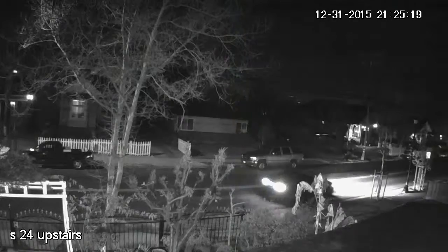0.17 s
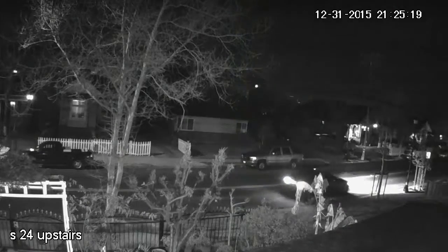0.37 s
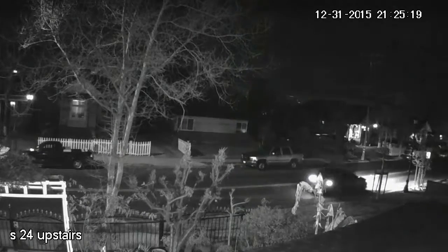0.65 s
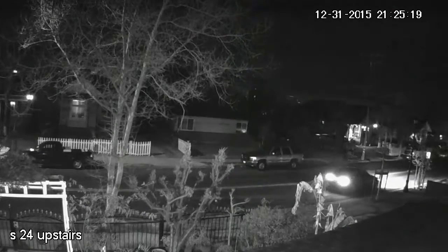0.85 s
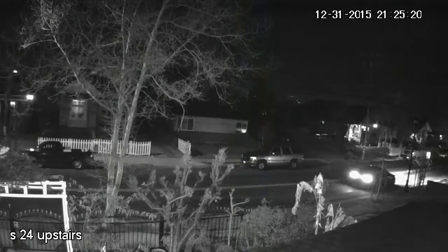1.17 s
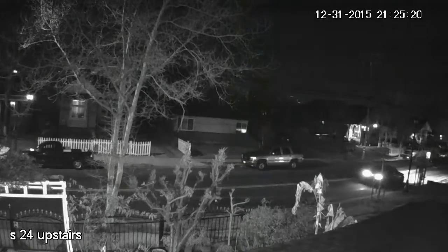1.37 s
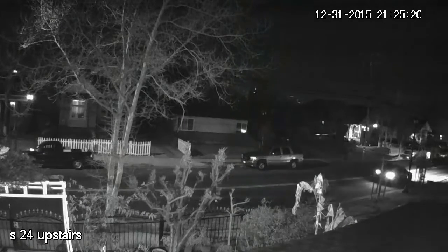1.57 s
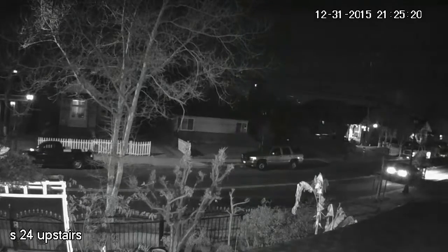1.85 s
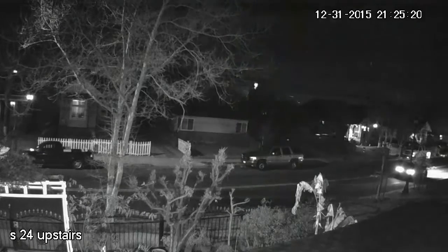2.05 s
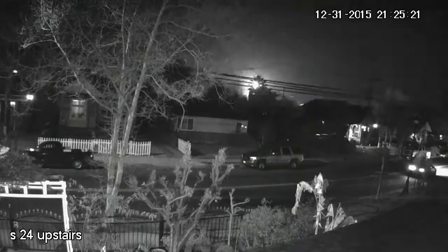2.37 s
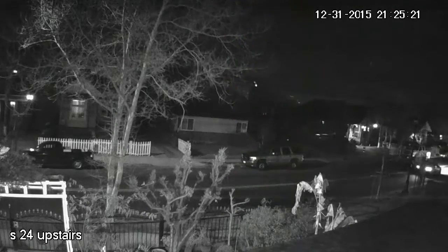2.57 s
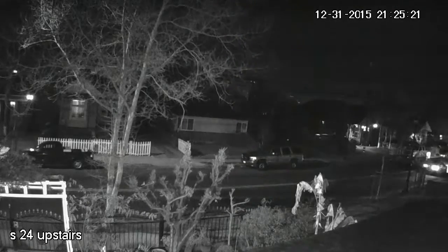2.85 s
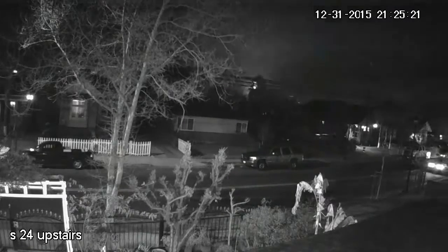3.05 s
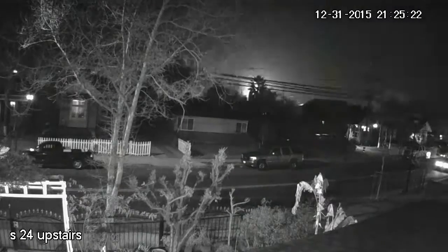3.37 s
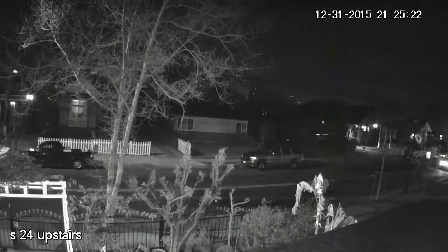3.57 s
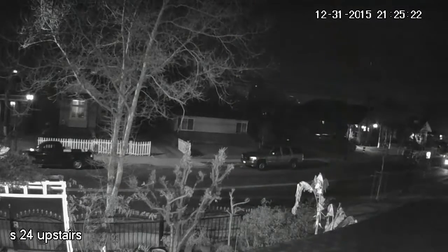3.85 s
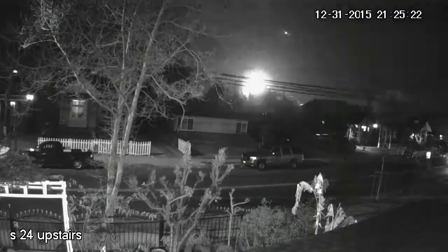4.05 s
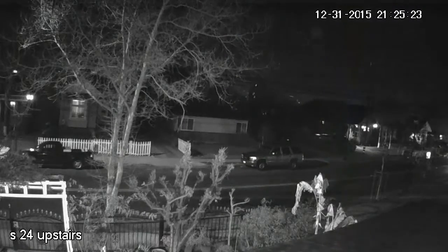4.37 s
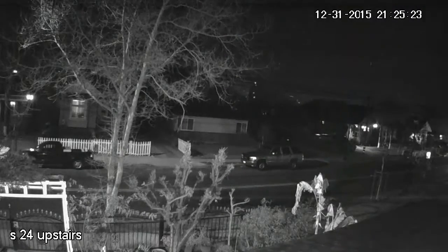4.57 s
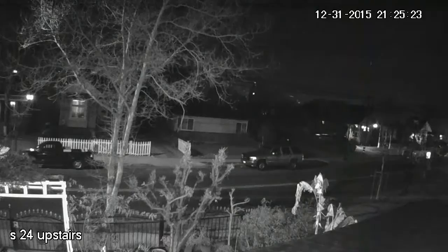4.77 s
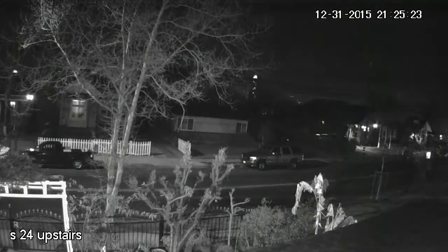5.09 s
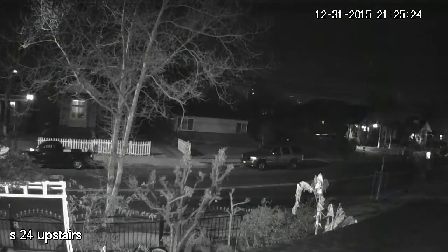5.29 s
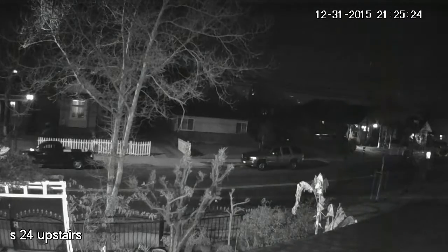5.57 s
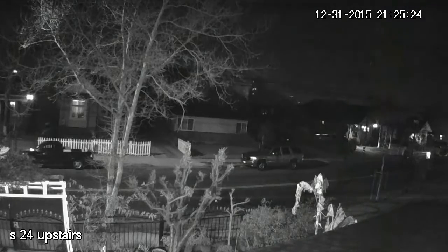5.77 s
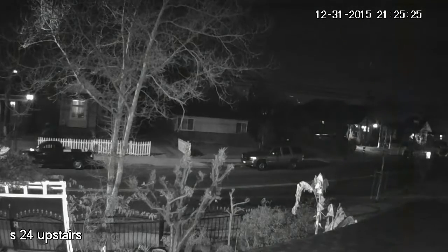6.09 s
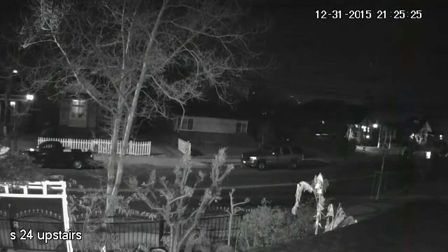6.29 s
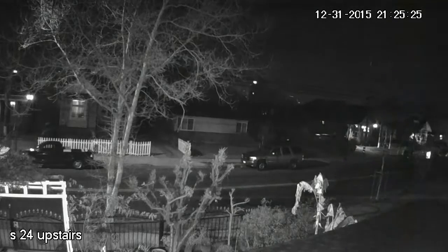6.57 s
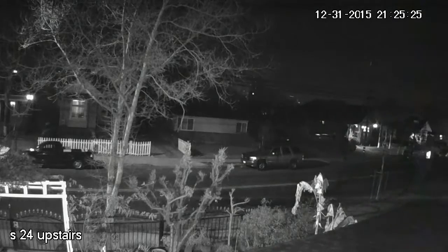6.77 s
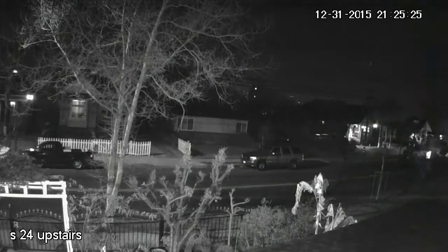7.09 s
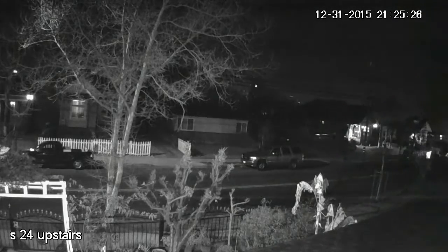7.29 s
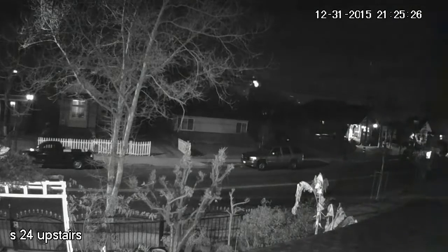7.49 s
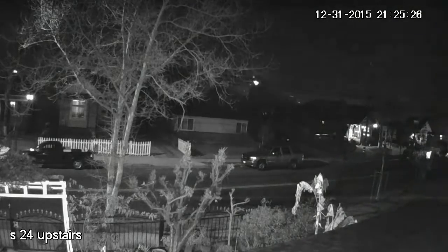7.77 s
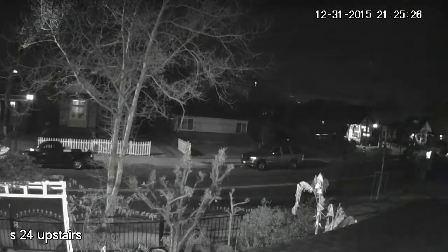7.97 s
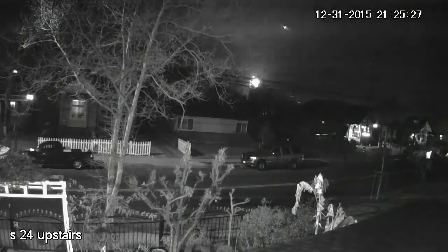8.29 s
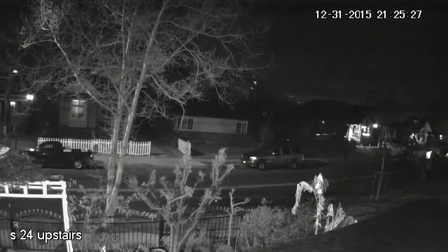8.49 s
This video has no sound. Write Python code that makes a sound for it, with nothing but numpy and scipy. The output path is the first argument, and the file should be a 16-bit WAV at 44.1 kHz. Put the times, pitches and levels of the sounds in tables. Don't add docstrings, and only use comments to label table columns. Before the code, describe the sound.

A muffled barrage of aerial fireworks booms over a residential street, each bang slapping back from houses, while a passing car fades early on.

```python
import sys
import numpy as np
from scipy import signal
from scipy.io import wavfile
from scipy.ndimage import uniform_filter1d

SR = 44100
rng = np.random.default_rng(int(sys.argv[2]) if len(sys.argv) > 2 else 0)


def wrap_up_sound(samples):
    columns = np.atleast_2d(samples).T
    tamed = np.clip(columns, -1, 1)
    steps = np.round(tamed * 32767).astype(np.int16)
    wavfile.write(sys.argv[1], SR, steps)


def nominal_scale(level):
    x = np.asarray(level, float) / 20
    return 10 ** x


N = 381024
CAMERA_RATE = 8000

# delay in seconds, depth of the wall in seconds,
# pitch of its body in Hz, body level in dB, crack level in dB.
WALL_ECHOES = [(0.017, 0.0084, 320, -11.5, -17), (.025, 0.0031, 445, -11, 0), (.035, 0.0084, 400, -4.5, 0),
               (.043, 0.011, 360, -5.5, -13.5), (.071, .006, 260, -5, -9.5), (.099, 0.006, 380, 0, -12),
               (.110, .018, 345, 0.5, -4.5), (.123, 0.0053, 385, -1.5, -13.5),
               (.140, 0.015, 255, -14, -13.5), (.149, 0.009, 290, -6, -12), (.163, 0.017, 236, -5.5, -18),
               (.185, 0.0096, 345, -13.5, -17.5), (.212, 0.013, 270, -13.5, -28),
               (.223, 0.0056, 455, -6, -7.5), (0.238, 0.01, 320, -14, -15), (.265, .018, 290, -14.5, -20),
               (.305, 0.0067, 375, -14, -14), (.371, 0.01, 300, -7.5, -24.5),
               (.389, 0.014, 310, -10, -15.5), (.417, 0.0053, 310, -11.5, -20.5),
               (.45, .012, 390, -16, -20), (.543, 0.015, 330, -17, -20.5)]


def shells(likeness=.6):
    # start in seconds, blast strength in dB, bass in dB, answer of the far walls in dB,
    # ring of the mortar tube in dB.
    firings = [(0.9785, 1, 1, -6, -13), (1.909, 0.5, 1, 1, -12.5), (3.5865, 1, 1.5, 1, -9.5),
               (3.6278, 0.5, -2, 1.5, -8.5), (3.821, 0.5, 2, -4, -7), (4.016, -1.5, 4.5, 0, -8),
               (4.401, -1, 0.5, 4, -12), (4.6639, -0.5, 0.5, 3.5, -9), (4.8644, 1.5, 3, 7, -13),
               (4.9267, -1, -2, -5.5, -8.5), (5.0101, 1.5, -1, -1.5, -8.5), (5.662, -1.5, -3.5, -0.5, 6.5),
               (6.5306, 2, 1.5, -7, -11.5), (6.5943, -1, 2, 1, -10.5), (6.6626, 1, 2, -1, -9),
               (7.3761, 2, 1.5, -1, -13.5), (7.4666, -1, -0.5, -1.5, -9.5), (8.0647, 2, 0.5, 2, -11)]
    lead = .0002
    lumps_db = 3
    bright_db, bright_per_tube_db = 2.49, 0.2825
    tube = signal.iirpeak(311, 1.6, SR)

    out = np.zeros(N)
    frames = 330
    shape = rng.uniform(-1, 1, (len(WALL_ECHOES), 8))
    shared = rng.standard_normal((frames, 129, 2)) @ [1, 1j]
    lumps = uniform_filter1d(shared[:, -1:].real, size=3, axis=0)
    lumps = nominal_scale(lumps_db * np.tanh(lumps / lumps.std()))
    same = np.clip(likeness, 0, 1)
    for start, strength_db, bass_db, far_db, tube_db in firings:
        colour = bright_db + bright_per_tube_db * tube_db, bass_db
        change = rng.standard_normal((len(WALL_ECHOES), 8))
        own = rng.standard_normal((frames, 129, 2)) @ [1, 1j]
        scatter = same * shared + np.sqrt(1 - same ** 2) * own
        answer = roll(lumps * scatter, *colour)
        add(answer, 0, nominal_scale(-11 + bass_db) * burst(97, .035, 1.5))
        add(answer, 0, walls(shape, change, *colour, far_db))
        answer = answer + nominal_scale(tube_db) * signal.lfilter(*tube, answer)
        add(out, start - lead, nominal_scale(strength_db) * blast())
        add(out, start, nominal_scale(strength_db) * answer)
    return out


def blast(swell=.001, ring_hz=208):
    t = np.arange(0, .02, 1 / SR)
    envelope = (t / swell) ** 2 * np.exp(-t / swell)
    return nominal_scale(13.5) * envelope * np.sin(2 * np.pi * ring_hz * t)


def walls(shape, change, bright_db, bass_db, far_db):
    # pitch in Hz, spread of pitch between walls as a share, level in dB.
    ring_parts = [
        (182.5, 0.32, -1.5),
        (355.3, 0.013, -0.5),
        (1486, 0.062, -3),
        (996, 0.14, -4.5),
    ]
    usual_depth, far_delay = 0.0089, .33
    fewest_cycles = 2.8
    out = np.zeros(SR)
    for wall, fixed, moved in zip(WALL_ECHOES, shape, change):
        delay, depth, body_hz, body_db, crack_db = wall
        boom_db = -13.5 + 9 * np.log2(depth / usual_depth) - 17.0 * delay
        levels = boom_db + bass_db, body_db, crack_db + bright_db, crack_db + bright_db
        for k, (hz, spread, db) in enumerate(ring_parts):
            hz = body_hz if k == 1 else hz
            length = max(1.41 * depth, fewest_cycles / hz)
            phase = 3 * fixed[k + 4] + .5 * moved[k + 4]
            ring = burst(hz * (1 + spread * fixed[k]), length, phase)
            db = levels[k] + db + 0.63 * moved[k] + far_db * (delay > far_delay)
            add(out, delay - length / 2, nominal_scale(db) * ring)
    return out


def roll(chance, bright_db, bass_db):
    # pitch in Hz, starting level in dB, time to die away by 60 dB in seconds.
    roll_bands = [(61.3, -28.5, 2), (97, -21, 4.9), (161.3, -23.5, 2.9), (227, -16, 3.9), (334, -17, 2.6),
                  (489, -16, 2.6), (750, -26, 2.5), (953, -22.5, 2.3), (1260, -24, 2.6), (1510, -20, 2.3),
                  (1758, -32.5, 2), (2260, -52, 1.8)]
    boom_top_hz, crack_bottom_hz = 225, 700
    hz = np.fft.rfftfreq(256, 1 / CAMERA_RATE)
    t = np.arange(len(chance)) * 64 / CAMERA_RATE
    db = read(roll_bands, hz) + bright_db * (hz > crack_bottom_hz) + bass_db * (hz < boom_top_hz)
    db = db - 60 * t[:, None] / read(roll_bands, hz, column=2)
    tail = signal.istft((chance * nominal_scale(db - 5)).T, nperseg=256, noverlap=192)[1]
    build_up = 1 - np.exp(-np.arange(len(tail)) / (0.061 * CAMERA_RATE))
    return signal.resample_poly(tail * build_up, SR, CAMERA_RATE)


def burst(hz, length, phase):
    t = np.arange(0, length, 1 / SR)
    return np.sin(np.pi * t / length) ** 2 * np.cos(2 * np.pi * hz * (t - length / 2) + phase)


def car():
    # time in seconds, pitch in Hz, level in dB.
    exhaust = [(0, 85.07, -20.5), (.15, 83.9, -28.5), (.45, 84.24, -23), (.9, 85.3, -24.5),
               (1.15, 86.76, -33), (1.45, 86.44, -24.5), (1.75, 86.35, -35), (2.1, 85, -45),
               (3, 86.9, -37.5), (3.55, 79.3, -45.5)]
    # start in seconds, length in seconds, pitch in Hz, level in dB.
    bump = (.03, .055, 88, -12)
    turns = np.cumsum(curve(exhaust)) / SR
    note = np.sin(2 * np.pi * turns)
    note = note + nominal_scale(-15) * np.sin(np.pi * turns) + nominal_scale(-19.0) * np.sin(6 * np.pi * turns)
    gone = np.clip(exhaust[-1][0] + 0.26 - np.arange(N) / SR, 0, .3) / 0.2
    out = np.sqrt(2) * nominal_scale(curve(exhaust, column=2)) * gone * note
    start, length, hz, db = bump
    add(out, start, nominal_scale(db) * burst(hz, length, 0))
    add(out, start, nominal_scale(db - 7.0) * burst(2.1 * hz, length, 0.82))
    return out


def street():
    # pitch in Hz, level in dB per Hz.
    town_colour = [(12, -28.5), (22, -12), (42, -3.5), (70, -8.5), (150, -15.5), (280, -12.5), (450, -15.5),
                   (750, -23), (980, -19), (1250, -23.5), (1500, -18.5), (1900, -41.5), (2600, -67),
                   (4000, -110)]
    # pitch in Hz, level in dB per Hz.
    tyre_colour = [(20, -13), (60, -2.5), (110, -2.5), (160, 1.5), (250, -2.5), (330, -13.5), (1000, -12),
                   (1500, -12), (2000, -41), (3000, -82)]
    swell_time, passing = 3.0, 0.89
    t = np.arange(N) / SR
    town_db = -25 - 7.5 * np.clip(1 - (t / swell_time) ** 2, 0, 1)
    tyres_db = np.maximum(-30.0 - 8 * np.maximum(t - passing, 0), -51)
    town = nominal_scale(town_db) * wash(town_colour, patchy_db=0.0)
    return town + nominal_scale(tyres_db) * wash(tyre_colour, patchy_db=0.5)


def wash(spectrum, patchy_db):
    frames, hz = N // 512 + 5, np.fft.rfftfreq(2048, 1 / SR)
    a, b, patches = rng.standard_normal((frames, 1025, 3)).T
    patches = uniform_filter1d(uniform_filter1d(patches, 10, 0), 8, 1)
    db = read(spectrum, hz)[:, None] + patchy_db * patches / patches.std()
    out = signal.istft((a + 1j * b) * nominal_scale(db), nperseg=2048, noverlap=1536)[1][:N]
    return out / out.std()


def read(points, hz, column=1):
    table = np.transpose(points)
    return np.interp(np.log(hz + 1), np.log(table[0] + 1), table[column])


def curve(rows, column=1):
    table = np.transpose(rows)
    return np.interp(np.arange(N) / SR, table[0], table[column])


def add(mix, start, sound):
    part = mix[max(round(start * SR), 0):][:len(sound)]
    part += sound[:len(part)]


def scene():
    return (shells() + street() + car())[None]


def band_limit(x):
    return signal.sosfilt(signal.butter(12, 15900, fs=SR, output="sos"), x)


def record(dry, full=.70, headroom=0.015, offset=0.01, pass_hz=3960):
    low = signal.resample_poly(dry, CAMERA_RATE, SR, axis=1)
    low = np.clip((low + offset) / full, -1, 1)
    mu = 255
    steps = np.sign(low) * np.log1p(mu * abs(low)) / np.log1p(mu)
    steps = np.round(steps * 127) / 127
    low = full * np.sign(steps) * np.expm1(abs(steps) * np.log1p(mu)) / mu
    smooth = signal.firwin(numtaps=11467, cutoff=pass_hz, window=("kaiser", 9), fs=80 * SR)
    wide = signal.resample_poly(low, SR, CAMERA_RATE, axis=1, window=smooth, padtype="edge")[:, :N]
    wide = np.pad(wide, ((0, 0), (0, N - wide.shape[1])), "edge")
    wide = np.clip(wide, -full - headroom, full + headroom)
    return band_limit(wide)


dry = scene()
out = record(dry)
wrap_up_sound(out)
```